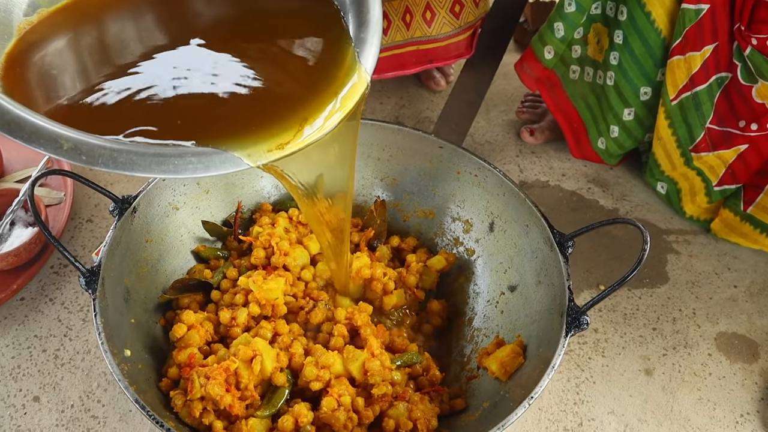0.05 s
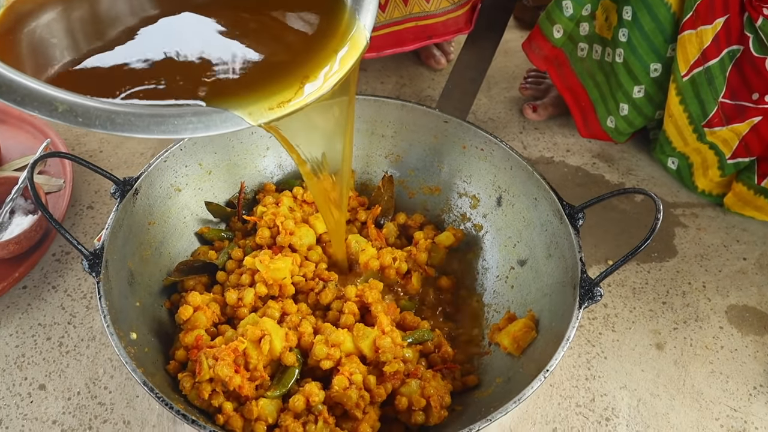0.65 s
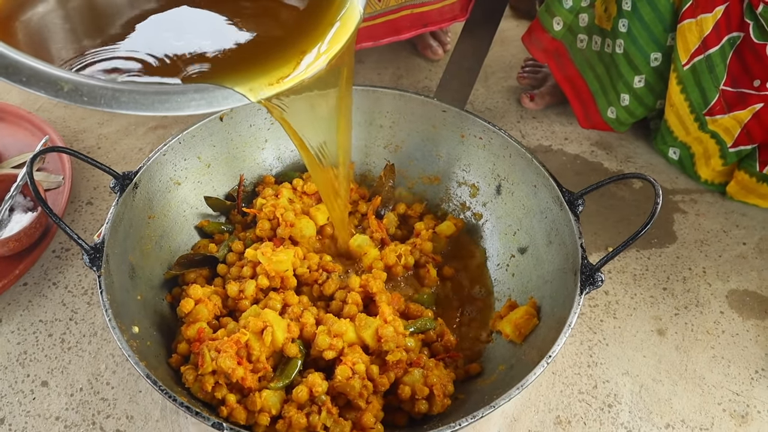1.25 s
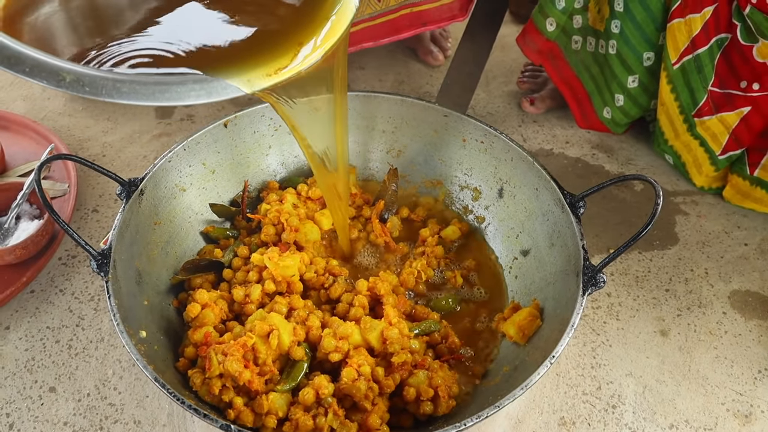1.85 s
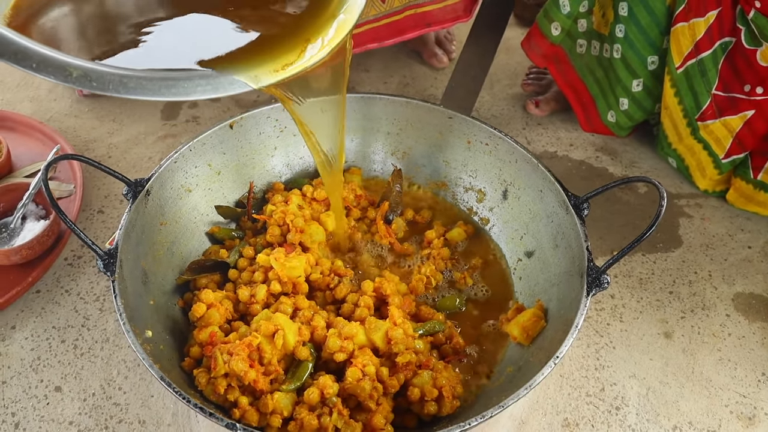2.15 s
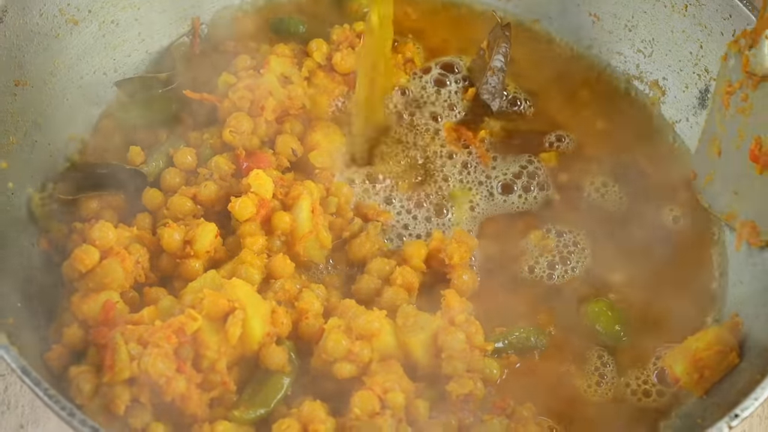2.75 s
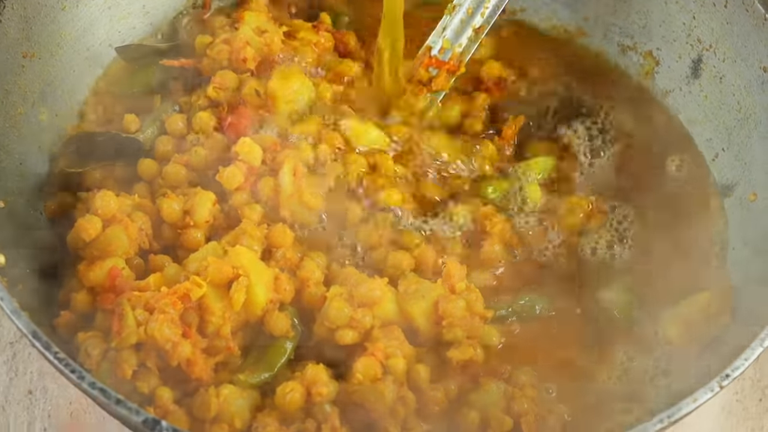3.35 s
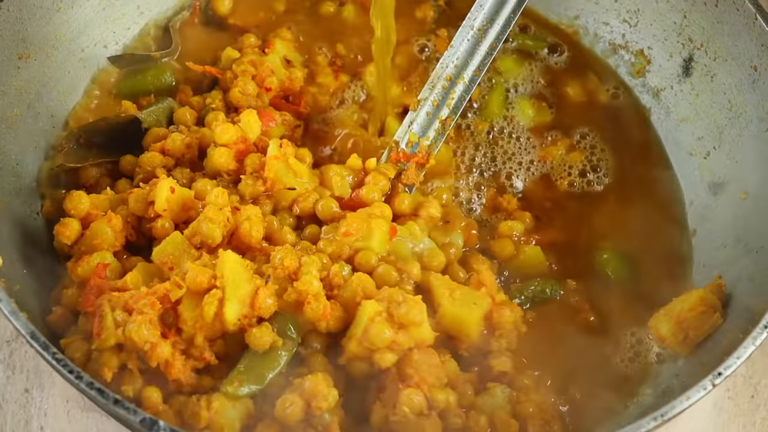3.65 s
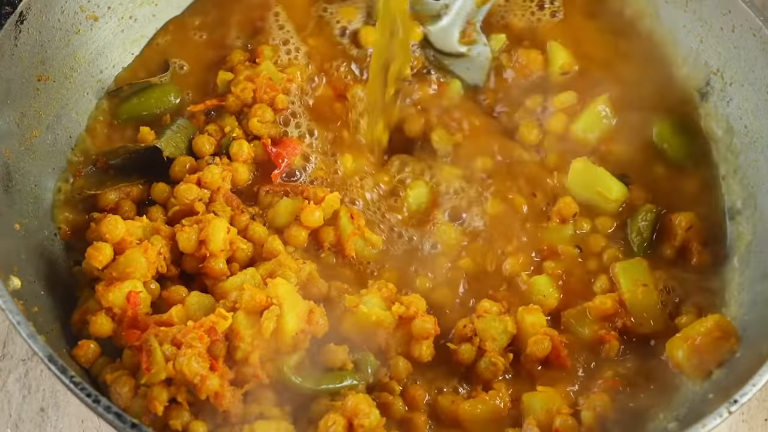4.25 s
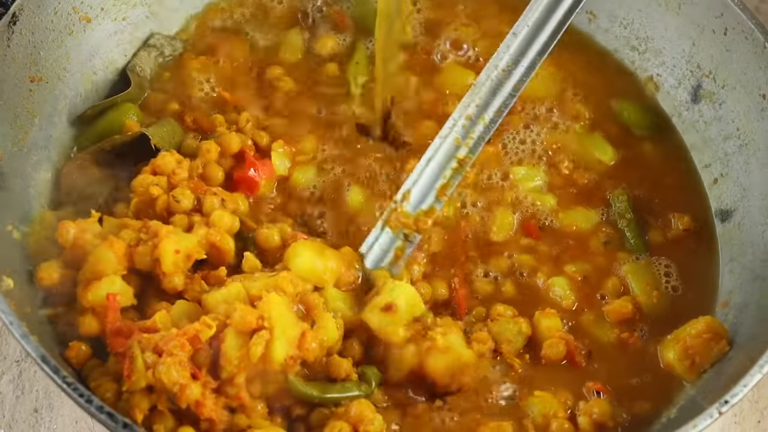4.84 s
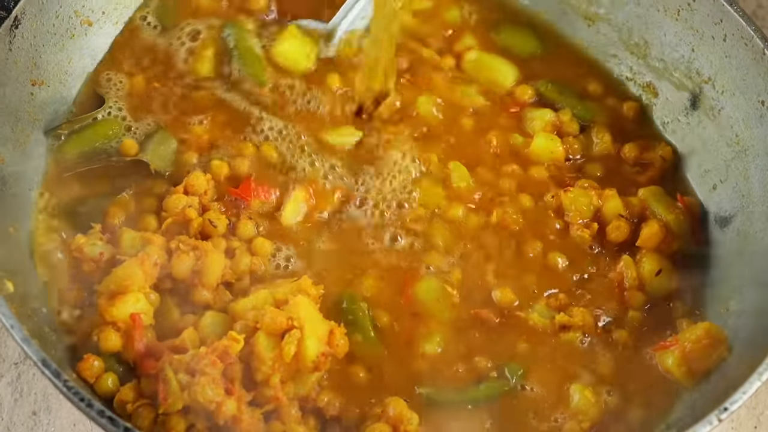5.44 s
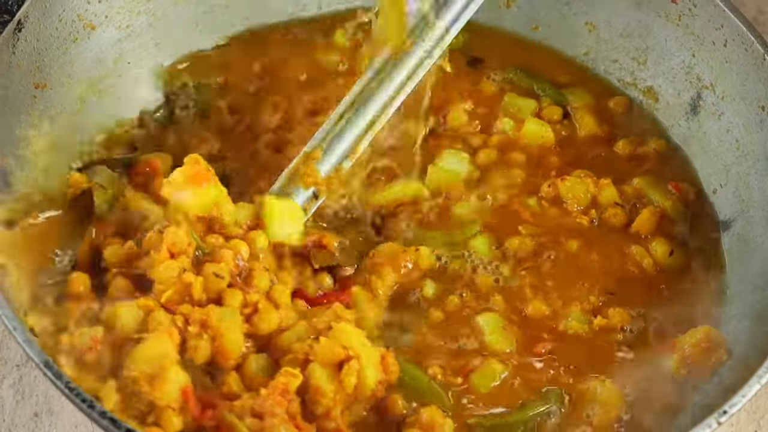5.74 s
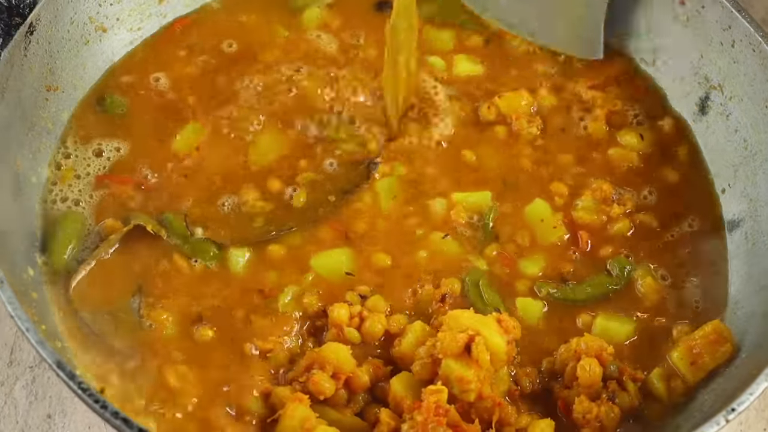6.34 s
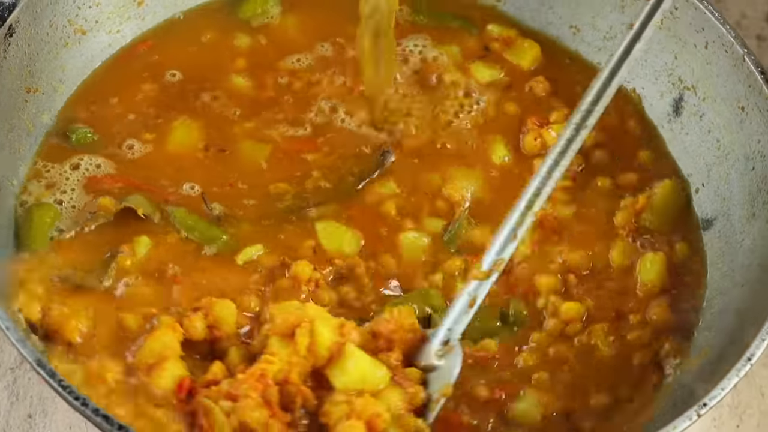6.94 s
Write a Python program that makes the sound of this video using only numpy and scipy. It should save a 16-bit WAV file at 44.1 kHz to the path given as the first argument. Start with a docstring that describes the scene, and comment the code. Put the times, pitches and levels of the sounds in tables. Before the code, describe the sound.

Close to a hot steel pan outdoors, poured water splashes onto fried food and flashes into a bright, bubbling sizzle. The steam hiss gradually weakens, flaring up whenever a ladle shoves the broth about, and a few bubbles plop. Finally the sizzle drops low, leaving spitting pops and brief, dull metal knocks and scrapes from the ladle. A faint rumble lies underneath, with no reverberation.

```python
"""Outdoors, close to a hot steel pan of fried food, a thin stream of water is poured in.
It splashes, boils and flashes to steam on the metal, heard as many ringing bubbles over a wash of noise.
The hiss sinks as the pan cools and surges when a ladle pushes water onto dry steel. At the end single
pops stand out and the ladle knocks and scrapes through the food. A faint rumble lies underneath."""
import sys
import numpy as np
from scipy import signal
from scipy.fft import rfft, irfft, next_fast_len
from scipy.io import wavfile

SR = 44100
rng = np.random.default_rng(int(sys.argv[2]) if len(sys.argv) > 2 else 0)


def output_pcm(signal):
    """Save a mono or channel-first signal as 16-bit PCM at the path in sys.argv[1].

    Samples are clipped to [-1, 1] before scaling.
    """
    pcm = np.clip(np.atleast_2d(signal).T, -1, 1) * 32767
    wavfile.write(sys.argv[1], SR, np.round(pcm).astype(np.int16))


N = 312713
TIME = np.arange(N) / SR


def from_db(db):
    """Amplitude ratio of a level in decibels."""
    return 10 ** (np.asarray(db) / 20)


def rms_one(x):
    """Normalisation to unit power."""
    return x / np.sqrt(np.mean(x ** 2) + 1e-20)


def in_time(rows):
    """Linear interpolation of a table's columns to every sample."""
    times, *columns = np.transpose(rows)
    return [np.interp(TIME, times, column) for column in columns]


def add(out, t, sound):
    """Superposition of a short sound, starting at time t."""
    start = int(t * SR)
    out[start:start + len(sound)] += sound[:N - start]


def drift(rate_hz):
    """Low-pass noise: a smooth random fluctuation of unit spread."""
    step, settle = 40, 2000   # samples per coarse step; steps for the filter to settle
    pole = np.exp(-2 * np.pi * rate_hz * step / SR)
    noise = rng.standard_normal(N // step + settle + 2)
    slow = signal.lfilter([1], [1, -2 * pole, pole ** 2], noise)[settle:]
    return np.interp(np.arange(N) / step, np.arange(len(slow)), rms_one(slow))


def band(x, low_hz, high_hz, order=2):
    """Band-pass filtering."""
    edges = [low_hz, min(high_hz, SR / 2 - 1000)]
    return signal.sosfilt(signal.butter(order, edges, "band", fs=SR, output="sos"), x)


def bell(hz, width_hz, db):
    """Second-order resonance or antiresonance, as filter coefficients (b, a)."""
    gain, half_width = from_db(db / 2), np.tan(np.pi * width_hz / SR)
    tuning = -2 * np.cos(2 * np.pi * hz / SR)
    b = np.array([1 + half_width * gain, tuning, 1 - half_width * gain])
    a = np.array([1 + half_width / gain, tuning, 1 - half_width / gain])
    return b / a[0], a / a[0]


def ring(clicks, hz, t60):
    """Damped harmonic oscillator: a unit impulse starts a sine of amplitude 1."""
    decay, angle = np.exp(-np.log(1000) / (t60 * SR)), 2 * np.pi * hz / SR
    return signal.lfilter([0, np.sin(angle)], [1, -2 * decay * np.cos(angle), decay ** 2], clicks + 1e-18)


def blips(rows, cycles, glide, onset_cycles):
    """Free decay: each row dies away within `cycles` periods as its pitch shifts by the share `glide`."""
    out = np.zeros(N)
    for t, db, hz in rows:
        age = TIME[:int(cycles / hz * SR) + 2] * hz / cycles
        envelope = np.exp(-np.log(1000) * age) * (1 - np.exp(-age * cycles / onset_cycles))
        phase = 2 * np.pi * cycles * age * (1 + glide * age / 2)
        add(out, t, from_db(db) * envelope / envelope.max() * np.sin(phase))
    return out


def outdoor_rumble():
    """Ambient noise: a faint, steady band of low frequencies."""
    return from_db(-53.5) * rms_one(band(rng.standard_normal(N), 22, 108))


# nudges to the microphone stand: t/s, relative level/dB
STAND_NUDGES = [(.02, -45), (.53, -35), (2.55, -36), (3.29, -33.5), (4.36, -37), (4.95, -35), (6.51, -33)]
def stand_sway(hz=34.6):
    """Free vibration: each nudge sets the stand wobbling at its natural frequency."""
    nudges = [(t, db, hz) for t, db in STAND_NUDGES]
    return from_db(-5.5) * blips(nudges, cycles=28, glide=0, onset_cycles=0.8)


# the band cancelled by the wall echo: t/s, f/Hz
ECHO_NOTCH = [(0, 6070), (1.4, 6160), (2, 6010), (3.4, 5990), (4.9, 6120), (7.09, 6130)]
def wall_echo(x, width_hz, depth_db, block=512):
    """Destructive interference: the pan wall's echo cuts a notch that moves with the sizzling spot."""
    centre_hz, = in_time(ECHO_NOTCH)
    out, state = np.zeros(N), np.zeros(2)
    for i in range(0, N, block):
        notch = bell(centre_hz[i], width_hz, depth_db)
        out[i:i + block], state = signal.lfilter(*notch, x[i:i + block], zi=state)
    return out


def rim_reflections(x, delay_s, roam, level_db):
    """Comb filtering: as the sizzling spots wander, three changing paths via the rim ripple the hiss."""
    out = x.copy()
    for k in range(3):
        delay = delay_s * (1 + k / 2) * (1 + roam * drift(0.36))
        out += (-1) ** k * from_db(level_db) * np.interp(TIME - delay, TIME, x)
    return out


# lumps of food shifting against the pan: t/s, relative level/dB, f/Hz
FOOD_THUDS = [(1.226, -23, 190), (1.772, -17.5, 199), (2.337, -24, 200), (3.281, -20.5, 170),
              (3.882, -31, 140), (4.055, -18, 280), (4.731, -15.5, 202), (6.566, -19, 200),
              (6.792, -23, 190)]
def food_thuds():
    """Soft impact: a lump of food gives a low, heavily damped pulse of falling pitch."""
    return from_db(-1) * blips(FOOD_THUDS, cycles=3.1, glide=-0.15, onset_cycles=0.48)


# drags of the ladle over the steel: t/s, duration/s, level/dB, f/Hz
LADLE_DRAGS = [(3.048, 0.045, -24, 1540), (3.085, 0.057, -30.5, 550), (6.475, .03, -30, 10100),
               (6.584, 0.126, -40.5, 262), (6.609, .125, -29.5, 1420), (6.68, 0.038, -32, 3500),
               (6.729, 0.16, -42, 1050), (6.928, .006, -22.5, 9600)]
def ladle_scrapes(slips_per_s=2500):
    """Stick-slip friction: each drag is a run of tiny random slips, heard in a narrow band."""
    out = np.zeros(N)
    for t, duration, db, hz in LADLE_DRAGS:
        slips = rng.standard_normal(N) * (rng.random(N) < slips_per_s / SR)
        rasp = rms_one(band(slips[:int(duration * SR)], hz / 1.154, hz * 1.08))
        add(out, t, from_db(db) * rasp * signal.windows.tukey(len(rasp), 0.5))
    return out


# blows of the ladle on the pan: t/s, level/dB
LADLE_BLOWS = [(6.5633, -9), (6.5675, -13), (6.5775, -18), (6.7098, -21)]
# modes of the pan: f/Hz, relative level/dB, T60/s
STEEL_MODES = [(1050, -16.5, 0.025), (2030, -22, 0.022), (2340, -2.5, 0.012), (3000, -9.5, 0.025),
               (4100, -8, 0.015), (4700, -10, .014), (5330, -8, .014), (7250, -4, .006), (9350, -6, .004),
               (14500, -13, .002)]
def ladle_knocks():
    """Modal vibration: each blow excites the modes of the pan, which the food quickly damps."""
    out = np.zeros(N)
    times, blow_db = np.transpose(LADLE_BLOWS)
    for k, (hz, mode_db, t60) in enumerate(STEEL_MODES):
        clicks = np.zeros(N)
        clicks[(times * SR).astype(int)] = from_db(blow_db + mode_db + rng.normal(0, 1.3, len(times)))
        out += (-1) ** k * ring(clicks, hz, t60)
    return out


# broad spectrum of the frying: f/Hz, relative level/dB
FRYING_SPECTRUM = [(40, -13), (90, -12.5), (170, -7.5), (380, -10.5), (700, -10), (1200, -5.5), (2000, -4),
                   (3500, -3.5), (5000, 0), (7000, -3), (9000, -2), (11000, -2.5), (13500, -5.5),
                   (15700, -9)]
# resonances and dips of the pan's bowl: f/Hz, bandwidth/Hz, gain/dB
BOWL_RESONANCES = [(524, 134, 5), (930, 240, 4.5), (1360, 43, 0.5), (1535, 160, 2.5), (1920, 100, 4),
                   (2214, 320, 2), (2750, 120, -2), (3030, 110, -6), (3100, 53, 5), (4600, 150, 0.5),
                   (5100, 400, 0.5), (7410, 740, 3), (11530, 870, -2.5), (12800, 1200, 1)]
def in_bowl(x):
    """Source and filter: a flat sound takes on the spectrum of frying and the bowl's resonances."""
    size = next_fast_len(N)
    hz, db = np.transpose(FRYING_SPECTRUM)
    tilt_db = np.interp(np.log(np.fft.rfftfreq(size, 1 / SR) + 1), np.log(hz), db)
    x = irfft(rfft(x, size) * from_db(tilt_db), size)[:N]
    for resonance in BOWL_RESONANCES:
        x = signal.lfilter(*bell(*resonance), x)
    return x


def bubbles(low_hz, high_hz, per_s, cycles, size_db, pitches=26):
    """Bubble resonance: bubbles of random strength and pitch arrive in clumps and ring; unit power."""
    births = np.flatnonzero(rng.random(N) < per_s * from_db(2 * drift(25)) / SR)
    strength_db = size_db * np.minimum(rng.exponential(1, N)[births], np.pi)
    kicks = from_db(strength_db) * rng.choice([-1, 1], N)[births]
    pitch_index = rng.integers(0, pitches, N)[births]
    out = np.zeros(N)
    for k, hz in enumerate(np.geomspace(low_hz, high_hz, pitches)):
        clicks = np.zeros(N)
        clicks[births] = kicks * (pitch_index == k)
        out += hz * ring(clicks, hz, cycles / hz)   # weighting by frequency keeps the spectrum flat
    return rms_one(out)


def seethe(low_hz, high_hz, per_s, cycles, size_db, wash_db, flutter_db):
    """Random superposition: countless tiny bubbles merge into noise under distinct ones; unit power."""
    grains = band(bubbles(low_hz, high_hz, per_s, cycles, size_db), low_hz / 2, high_hz * 2)
    wash = from_db(wash_db) * rms_one(band(rng.standard_normal(N), low_hz, high_hz, order=3))
    return rms_one(in_bowl(grains + wash) * from_db(flutter_db * drift(34)))


def surge(peak_s, rise_s, swell=0.56, fade=0.47):
    """Power envelope: a smooth swell to 1, then exponential decay as the water is spent."""
    age = (TIME - peak_s) / rise_s
    return np.exp(-np.where(age < 0, (age / swell) ** 2, age / fade))


# large air bubbles in the broth: t/s, relative level/dB, f/Hz
AIR_BUBBLES = [(3.574, -7, 2230), (3.603, -7.5, 930), (3.640, -15, 890), (4.306, -7, 1000),
               (5.040, -13, 990), (5.075, -11, 920), (5.140, -11, 805), (5.220, -15, 810),
               (5.257, -13, 860), (5.306, -21, 755), (5.542, -7, 1000), (5.904, -13, 794)]
def plops():
    """Volume pulsation: each large air bubble rings briefly with rising pitch."""
    return from_db(-10) * blips(AIR_BUBBLES, cycles=13.6, glide=0.12, onset_cycles=1.2)


# the ladle shoves broth about: peak t/s, rise/s, level/dB
BROTH_SLOSHES = [(3.11, 0.24, -33), (4.09, 0.066, -34), (4.33, 0.23, -31.5), (5.08, 0.049, -41),
                 (5.45, 0.14, -37), (6.6, 0.056, -36.5), (6.74, 0.11, -31.5)]
def broth(stream_db, boil_gain):
    """Air entrainment: the stream drums on the food and traps air; the broth sloshes and boils."""
    slosh_power = sum(from_db(db) ** 2 * surge(t, rise_s) for t, rise_s, db in BROTH_SLOSHES)
    splash_gain = np.sqrt(from_db(stream_db) ** 2 + slosh_power)
    drum_gain = from_db(-42) * (splash_gain / from_db(stream_db.mean())) ** 0.36   # follows it weakly
    drum = seethe(78, 354, per_s=160, cycles=7.1, size_db=1, wash_db=-0.5, flutter_db=1.5)
    splash = seethe(363, 1140, per_s=300, cycles=16.4, size_db=3, wash_db=1.5, flutter_db=1.05)
    boil = seethe(1174, 2606, per_s=600, cycles=37, size_db=1.5, wash_db=3, flutter_db=0.3)
    gush = from_db(0.23 * drift(41))   # the stream breaks into lumps as it falls
    return (drum_gain * drum + splash_gain * splash + boil_gain * boil) * gush


# bursting bubbles and spits of fat: t/s, relative level/dB, f/Hz
FAT_POPS = [(3.4704, -12, 6840), (3.5254, -13, 4720), (3.6614, -10, 4150), (3.9234, -12, 4840),
            (6.1419, -10, 7350), (6.1506, -19, 3170), (6.1784, -28, 2220), (6.3274, -22, 2020),
            (6.4218, -14.5, 7810), (6.49, -14, 7140), (6.7092, -13, 4740), (6.715, -12.5, 4100),
            (6.7715, -22, 3200), (6.7864, -15, 5330), (6.827, -22, 4180), (6.8854, -26, 3080),
            (6.8975, -17, 8380), (6.9092, -14.5, 8860), (6.9304, -15, 7300)]
def spitting_fat():
    """Masking: fat spits throughout, but its spits and single pops stand out once the hiss is low."""
    spits = rms_one(in_bowl(bubbles(2400, 14400, per_s=450, cycles=20, size_db=7)))
    pops = blips(FAT_POPS, cycles=35, glide=0.065, onset_cycles=1.3)
    return from_db(-37) * spits + from_db(-2) * pops


# steady cooking, sinking as the pan cools and fills: t/s, then level/dB of splash, boil, sizzle, steam
STEADY_COOKING = [(0, -28, -20.5, -17, -19.5), (.67, -25, -21.5, -15.5, -21.5),
                  (1.37, -27, -22, -17, -20.5), (2.47, -30, -25, -20.7, -19.5),
                  (2.51, -34.5, -26.5, -25.5, -23), (3.86, -36.5, -31.5, -31, -31.5),
                  (4.3, -38, -22.5, -22.5, -23), (5.24, -36, -30.5, -32, -34),
                  (6.06, -37, -28.5, -30, -28.5), (6.2, -40, -36.5, -37.5, -35),
                  (6.92, -44, -38, -37.5, -42), (7.09, -37, -30.5, -33, -39.5)]
# water flares on hot steel, first by itself, later pushed by the ladle:
# peak t/s, rise/s, steam level/dB, sizzle over steam/dB, fine over coarse spray/dB
STEAM_SURGES = [(.28, 0.16, -16.8, -8, 16), (.46, 0.17, -17, -2.5, 7), (.59, .1, -13.5, -5, 3),
                (.66, 0.087, -11, -8, 3), (.8, .12, -17, -7, 8), (1.1, 0.44, -12.7, -8.5, 4),
                (1.73, 0.21, -18, -7, 2.5), (1.98, .12, -20, -5, 8), (2.25, 0.16, -16, -9, -2),
                (2.6, 0.14, -16, -10, 3), (2.95, 0.4, -20, -8, 4), (3.48, .31, -23.5, -6, 5),
                (3.94, 0.097, -28.5, 3, 2.5), (4.05, 0.078, -22, -2.5, 3), (4.13, .05, -20.5, -10, 0),
                (4.34, 0.18, -21.5, -11, 1), (4.65, .16, -17.5, -5, 3), (4.83, 0.17, -23, -5.5, -2),
                (5.1, 0.12, -19.5, -5, 5.5), (5.44, 0.16, -25, -3.5, 2), (5.79, 0.23, -19.5, -2.5, 0),
                (6.51, 0.14, -34, -3.5, -5), (7.05, 0.12, -29.5, -4.5, 1)]
def cooking_activity():
    """Incoherent sources add in power: the stream's level, then gains of boil, sizzle and two sprays."""
    stream_db, boil_db, sizzle_db, steam_db = in_time(STEADY_COOKING)
    power = from_db([boil_db, sizzle_db, steam_db - 2, steam_db - 3]) ** 2   # last two: coarse, fine
    for t, rise_s, surge_db, wet_db, fine_db in STEAM_SURGES:
        boil, sizzle = from_db([wet_db - 4, wet_db])
        coarse, fine = from_db([0, fine_db]) / np.hypot(1, from_db(fine_db))
        gains = from_db(surge_db) * np.array([boil, sizzle, coarse, fine])
        power += np.outer(gains ** 2, surge(t, rise_s))
    return stream_db, *np.sqrt(power)


def steam_hiss(sizzle_gain, coarse_gain, fine_gain):
    """Flash evaporation: drops turn to steam on the steel, as a sizzle and a coarse and a fine spray."""
    sizzle = seethe(2700, 6130, per_s=2000, cycles=32, size_db=1, wash_db=4, flutter_db=0.76)
    coarse = seethe(5920, 8200, per_s=1500, cycles=18, size_db=3, wash_db=0, flutter_db=0.8)
    fine = seethe(8220, 16500, per_s=4000, cycles=8.3, size_db=2, wash_db=-0.5, flutter_db=0.08)
    hiss = from_db(1.1) * sizzle_gain * sizzle
    hiss += from_db(1.2) * coarse_gain * coarse
    hiss += from_db(1.45) * fine_gain * fine
    return hiss * from_db(0.63 * drift(29))


def scene():
    """Free field: the sources add without reverberation and reach both channels alike."""
    stream_db, boil, sizzle, coarse, fine = cooking_activity()
    cooking = broth(stream_db, boil) + plops() + steam_hiss(sizzle, coarse, fine) + spitting_fat()
    cooking = rim_reflections(cooking, delay_s=0.0013, roam=0.067, level_db=-21.5)
    cooking = wall_echo(cooking, width_hz=660, depth_db=-12.5)
    ladle = ladle_knocks() + ladle_scrapes() + food_thuds()
    mono = outdoor_rumble() + stand_sway() + ladle + cooking
    return np.array([mono, mono])


def record(dry, cutoff_hz=15750):
    """Clipping and band limiting: peaks stop at full scale and a steep low-pass cuts the top."""
    low_pass = signal.ellip(12, 0.1, 70, cutoff_hz, fs=SR, output="sos")
    return signal.sosfilt(low_pass, np.clip(dry, -1, 1))


dry = scene()
out = record(dry)
output_pcm(out)
```